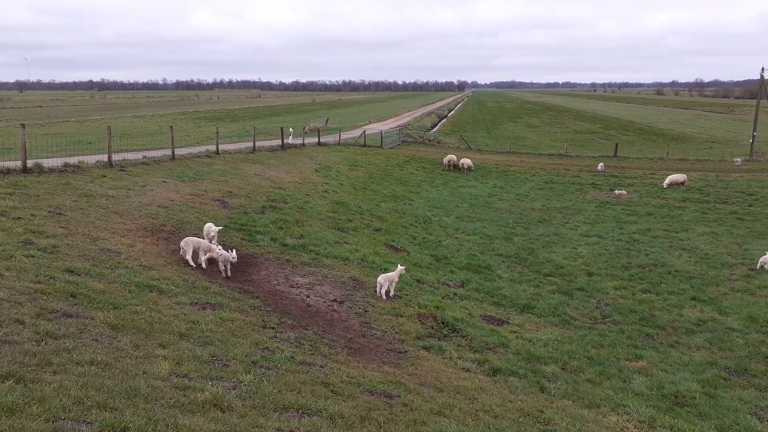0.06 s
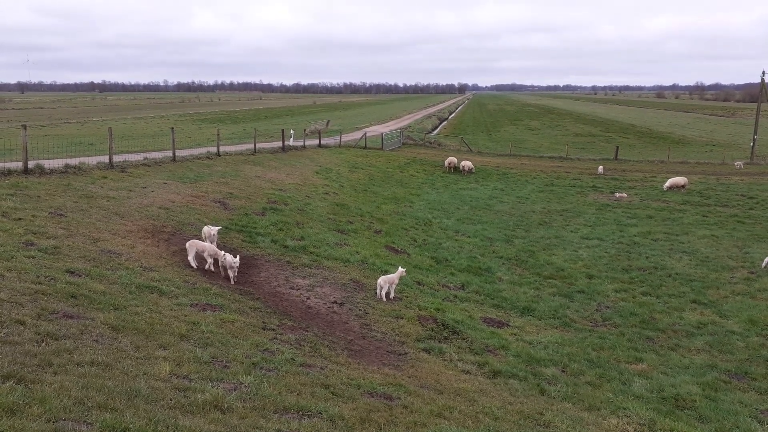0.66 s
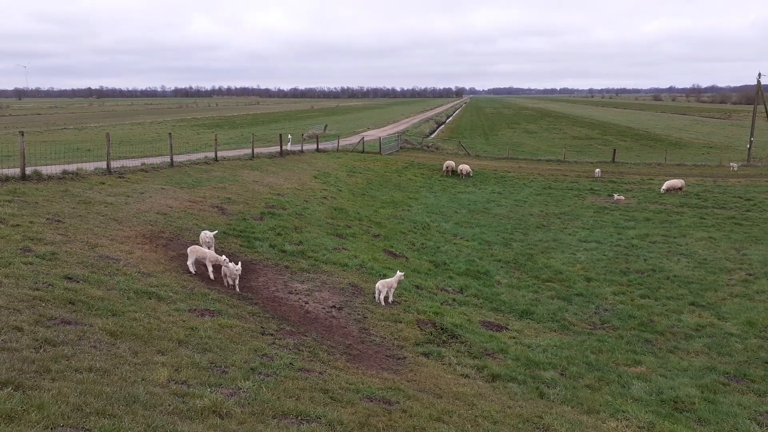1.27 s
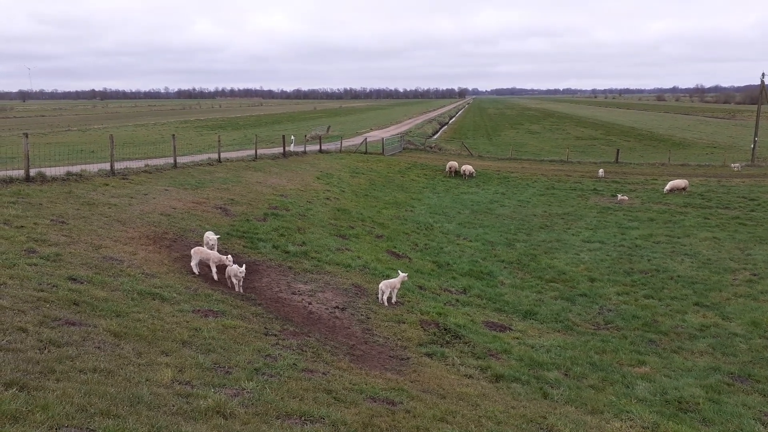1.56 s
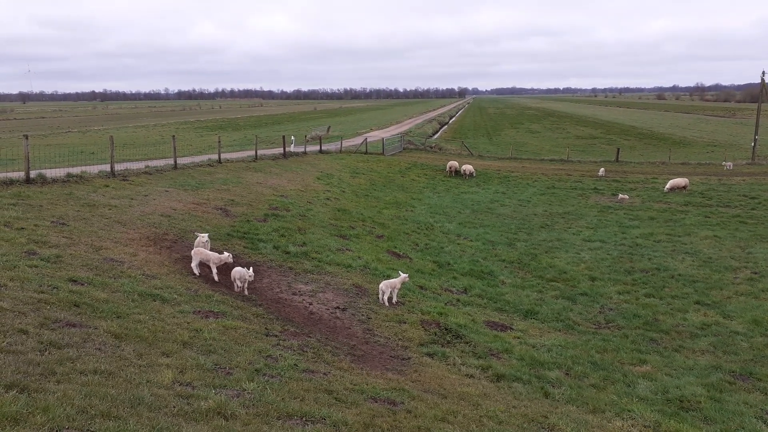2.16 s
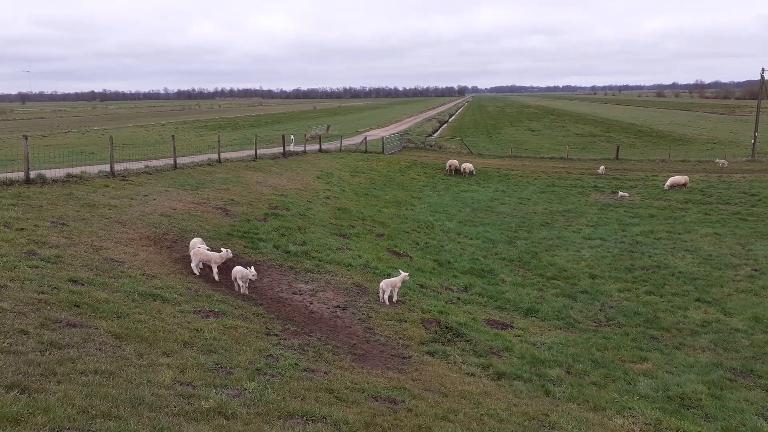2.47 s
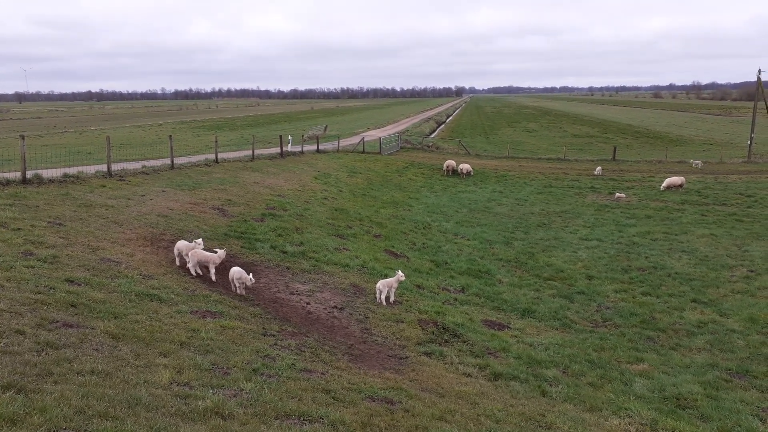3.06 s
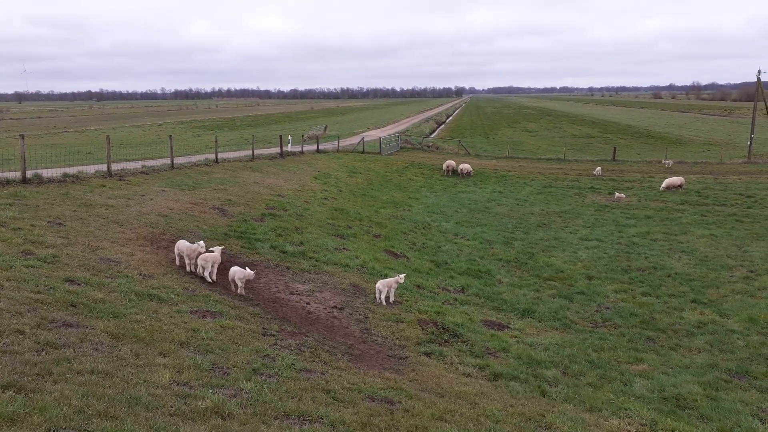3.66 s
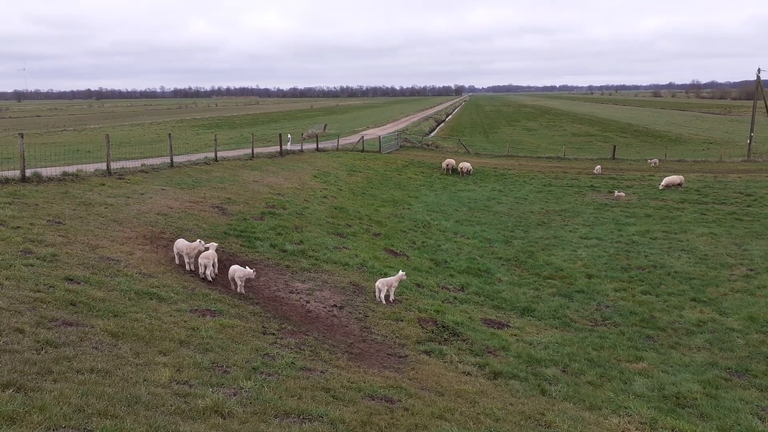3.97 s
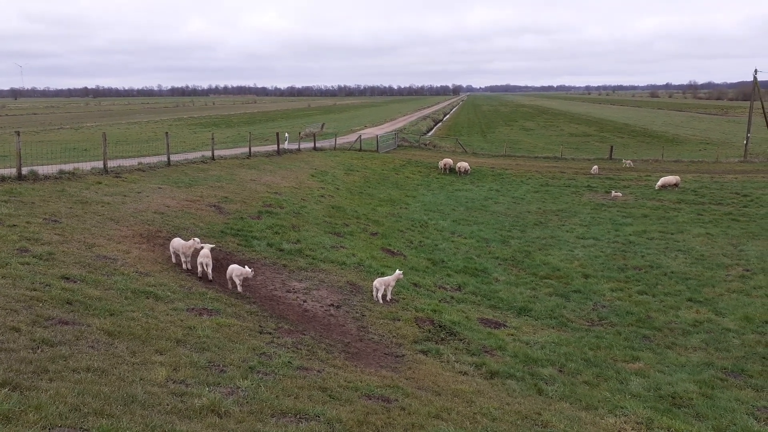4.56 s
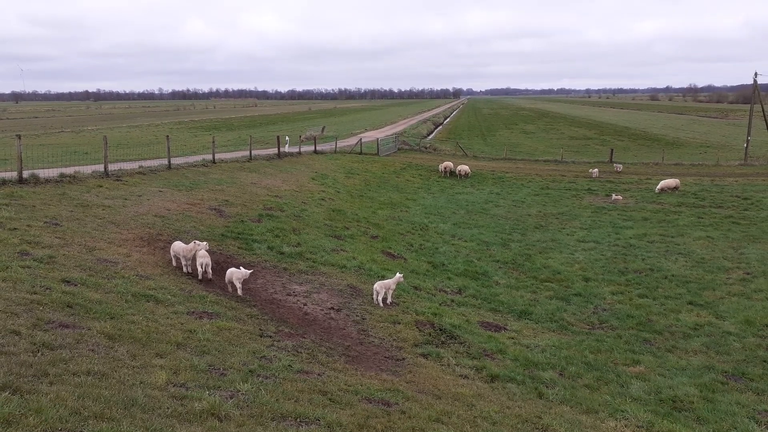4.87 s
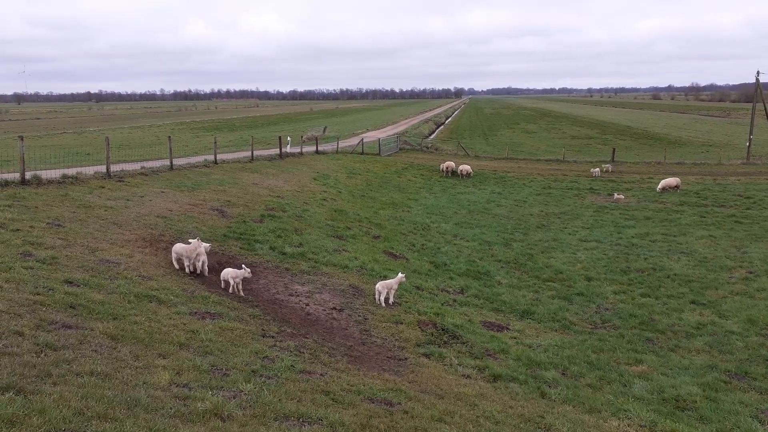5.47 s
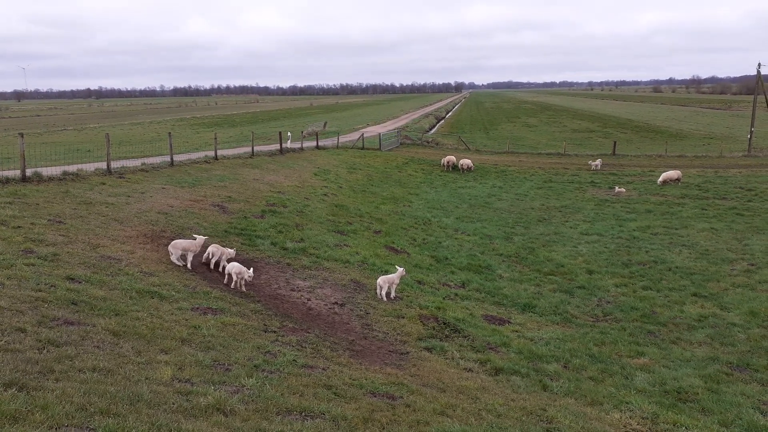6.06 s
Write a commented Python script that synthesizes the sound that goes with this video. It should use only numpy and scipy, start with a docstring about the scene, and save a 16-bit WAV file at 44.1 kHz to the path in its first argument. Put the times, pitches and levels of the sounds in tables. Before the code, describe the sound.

A light wind rumbles and flutters on the microphone in an open pasture, with irregular soft thuds. A lamb gives a faint short bleat, then a louder, high, quavering one follows. A sheep answers very faintly from far down the field, and near the end a lamb bleats again, clearly. Distant birds whistle and chirp very quietly throughout, over a soft hiss and slight rustles.

```python
"""A light wind buffets two microphone ports while far-off birds whistle and slur over a pasture.
Eddies press on the ports as rumble, flutter and soft thuds, above a steady hiss and soft rustles.
Lambs bleat three times, and a sheep once from far down the field. Each bleat is a string of throbs,
about fourteen a second, in which the vocal folds excite the resonances of throat and mouth.
One faint tick sounds near the end."""
import sys
import numpy as np
from scipy import signal
from scipy.fft import rfft, irfft, next_fast_len
from scipy.io import wavfile
from scipy.ndimage import uniform_filter1d

SR = 44100
rng = np.random.default_rng(int(sys.argv[2]) if len(sys.argv) > 2 else 0)


def store_pcm(level_fs):
    """Save levels as 16-bit WAV."""
    pcm = np.round(np.clip(level_fs, -1, 1) * 32767).astype(np.int16)
    wavfile.write(sys.argv[1], SR, np.atleast_2d(pcm).T)


N = 278271

# the breeze between gusts: time_s, rumble_db
BREEZE = [(0, -61), (.52, -70), (.72, -50.5), (1.1, -56.5), (2.1, -52.5), (2.3, -60.5), (2.8, -43.5),
          (3.1, -48), (3.52, -60.5), (3.65, -53), (4.05, -50.5), (4.3, -49), (5.1, -52), (5.9, -51),
          (6.31, -50)]
# the wind veering between the ports: time_s, rumble_left_minus_right_db
VEER = [(0, 2.5), (.3, -0.5), (.55, -44), (.8, -1.5), (1.7, -1.5), (2.7, -3), (3.2, 15), (3.55, 17),
        (4.3, 11), (4.7, -6.5), (5.0, -2.5), (6.31, 4)]
# gusts: peak_s, half_length_s, rumble_db, flutter_minus_rumble_db
GUSTS = [(.01, 0.027, -44, -3), (0.171, 0.016, -48.5, -6.5), (0.332, 0.058, -44, -3),
         (0.78, 0.04, -43.5, -4.5), (0.858, 0.021, -41, 1), (1.34, 0.04, -51, -2), (1.416, .02, -49.5, -22),
         (1.583, 0.052, -44, -2.5), (1.713, 0.023, -46, -0.5), (1.872, 0.053, -45, -7.5),
         (2.174, 0.033, -43, -11), (2.446, 0.047, -43.5, -6.5), (2.658, 0.039, -38, -4),
         (2.724, .024, -40.5, 1), (2.892, 0.015, -40.5, 3), (2.98, 0.021, -47, 2.5),
         (3.219, 0.075, -45.5, 6.5), (3.395, 0.039, -43.5, -3.5), (3.79, 0.085, -51.5, 3.5),
         (4.012, 0.019, -51, 3.5), (4.346, 0.046, -41, 2), (4.531, 0.017, -42.5, 2.5),
         (4.913, 0.098, -45.5, -6.5), (5.067, 0.036, -43, -5.5), (5.191, 0.02, -38, -8.5),
         (5.396, 0.064, -55, 1.5), (5.592, 0.026, -39, 2.5), (5.695, 0.06, -40.5, -12),
         (6.095, 0.033, -37, -1.5), (6.174, 0.052, -43.5, -5)]
# spectral shapes of the wind, hiss and rustle noises: frequency_hz, relative_density_db
RUMBLE_SPECTRUM = [(12, -21.5), (30, -13), (65, -0.5), (120, 3), (200, -2.5), (300, -6), (500, -31),
                   (900, -62.5)]
FLUTTER_SPECTRUM = [(120, -28), (220, -10.5), (330, 3.5), (480, -3.5), (700, -16), (1000, -25.5),
                    (1500, -39), (2500, -44.5), (5000, -63)]
HISS_SPECTRUM = [(180, -35.5), (300, -11), (372, -0.5), (622, -14), (1380, -21), (1740, -32.5), (4550, -29),
                 (5650, -38.5), (9610, -46.5), (10400, -35), (11900, -29), (15000, -26), (15800, -29)]
BRIGHT_RUSTLE_SPECTRUM = [(800, -27), (2200, 3.5), (3000, 4.5), (4800, 5), (7500, -1.5), (9500, -7.5),
                          (11200, 2), (12800, -5.5), (13900, 3), (15000, -10)]
DULL_RUSTLE_SPECTRUM = [(900, 21), (1400, 13), (1750, 11.5), (2150, 11), (2700, 1), (4500, -31),
                        (9000, -70.5)]
# bird notes: start_s, length_s, middle_pitch_hz, relative_level_db, shape_name
BIRD_NOTES = [(0.0, 0.36, 3750, -80.5, "rise"), (.01, 0.059, 4780, -75.5, "whistle"),
              (0.158, 0.25, 4350, -77, "whistle"), (0.484, .12, 3130, -75, "rising buzz"),
              (0.779, 0.2, 3460, -72.5, "falling buzz"), (1.216, 0.1, 4370, -77.5, "whistle"),
              (2.19, 0.023, 3170, -67.5, "fall"), (2.342, 0.12, 3990, -73.5, "whistle"),
              (2.606, 0.052, 4700, -77.5, "droop"), (2.697, 0.064, 4160, -73.5, "whistle"),
              (2.889, 0.089, 4070, -73.5, "droop"), (3.027, .03, 4340, -70.5, "fall"),
              (3.058, 0.05, 4840, -75.5, "trill"), (3.147, 0.072, 3150, -80.5, "fall"),
              (3.237, 0.039, 4240, -73.5, "fall"), (3.273, 0.049, 4730, -69, "trill"),
              (3.358, 0.038, 3000, -71, "fall"), (3.444, 0.02, 3700, -69.5, "droop"),
              (3.459, 0.068, 5100, -74.5, "rise"), (3.574, 0.0167, 4560, -68.5, "rise"),
              (4.122, 0.067, 4600, -77.5, "whistle"), (4.304, .045, 4350, -71.5, "fall"),
              (4.371, 0.036, 4550, -63, "fall"), (4.395, 0.16, 4550, -76.5, "trill"),
              (4.554, 0.07, 3350, -74.5, "rising buzz"), (4.636, 0.082, 5050, -74.5, "arch"),
              (4.712, 0.11, 2860, -77, "falling buzz"), (4.767, 0.08, 4940, -77.5, "arch"),
              (5.72, 0.21, 2950, -76, "falling buzz"), (6.015, 0.47, 2618, -74.5, "droop")]
# pitch contours by shape name: start_to_middle_ratio, end_to_middle_ratio, trill_share
NOTE_SHAPES = {"whistle": (1.01, 0.96, 0.15), "droop": (1.09, 0.88, 0.11), "trill": (1.01, 0.94, .65),
               "fall": (1.15, 0.826, 0.43), "rise": (0.72, 1.06, 0.17), "arch": (.85, .77, 0.18),
               "rising buzz": (.88, 1.2, 1), "falling buzz": (1.26, .93, .85)}
# soft rustles: peak_s, half_length_s, bright_db, dull_db
RUSTLES = [(0.733, 0.16, -65, -71), (.92, 0.18, -70.5, -71), (1.586, 0.22, -71, -69.5),
           (3.053, 0.07, -78, -73), (3.45, 0.19, -81, -64.5), (3.768, 0.058, -72.5, -69),
           (4.29, .17, -97, -63.5), (6.25, 0.61, -96, -69)]
# the strongest single eddies at the ports: start_s, peak_db, left_minus_right_db
EDDIES = [(.761, -30.5, -3), (1.704, -35.5, -15), (2.714, -27, 1), (2.886, -21.5, -2), (3.723, -33, 0),
          (4.538, -34, 6), (5.048, -29, 26), (5.584, -22.5, 0.5), (6.094, -22.5, 3)]
# each bleat from first throb to last: time_s, pitch_hz, level_db, roughness_share, brightness_db
FAINT_BLEAT = [(.775, 363, -52.5, 0.25, 9), (.921, 378.3, -52, 0.45, -1), (1.067, 359.5, -60.5, 0.33, -3)]
NEAR_BLEAT = [(1.556, 325.6, -54.5, 0.66, 2.1), (1.705, 344, -65.5, 0.28, 5), (1.852, 358, -46, 0.32, 9.5),
              (1.93, 360.3, -42, 0.37, 2.5), (2.0, 352.7, -43, 0.31, 1), (2.076, 335.3, -46.5, 0.35, 2),
              (2.149, 343, -45, 0.38, 2)]
FAR_BLEAT = [(3.84, 357, -70.5, 0.87, 0), (4.48, 352.4, -71, 0.82, 0)]
LAST_BLEAT = [(4.96, 387, -54, 0.23, -25), (5.04, 403.3, -46.5, .16, -7), (5.247, 409.2, -41, 0.23, -4),
              (5.32, 390.4, -43.5, 0.22, -5), (5.463, 393.3, -40.5, 0.31, 3), (5.605, 383.2, -46, 0.85, -2)]
# resonances of throat and mouth: centre_hz, width_hz, relative_gain_db
FAINT_FORMANTS = [(1160, 480, 1), (2200, 400, -3.5), (3540, 1200, -3), (4420, 350, 6), (5200, 300, 0),
                  (6860, 690, -25)]
NEAR_FORMANTS = [(1019, 150, 7.5), (1270, 690, 1), (1920, 140, 0), (2700, 180, 6.5), (3260, 370, 1),
                 (4040, 540, 1), (4900, 150, -4.5), (6450, 630, 4), (6970, 390, -18), (7990, 630, -1.5),
                 (10700, 1700, -20)]
FAR_FORMANTS = [(1360, 300, 9), (2010, 340, 4)]
LAST_FORMANTS = [(1287, 240, -0.5), (1690, 240, -6.5), (2080, 260, -7.5), (2435, 180, -20),
                 (2920, 420, -11), (3320, 310, -2.5), (4033, 150, -2), (4700, 370, -3.5), (5470, 460, -2),
                 (6120, 200, -11), (7130, 490, -23.5), (11100, 4600, -33)]
# a faint tick: start_s, excitation_db, centre_hz, width_hz
TICK = (5.888, -61, 7500, 4500)

THROBS_PER_S = 13.7


def from_db(db):
    """Amplitude grows tenfold for every 20 decibels."""
    return 10 ** (np.asarray(db) / 20)


def unit_rms(x):
    """Division by the root mean square gives unit power."""
    return x / np.sqrt(np.mean(x ** 2) + 1e-20)


def curve(rows):
    """Linear interpolation gives a value at every sample."""
    return np.interp(np.arange(N) / SR, *np.transpose(rows))


def add(out, sound, start_s):
    """Superposition: a sound adds to those already present."""
    at = int(round(start_s * SR))
    first, last = max(at, 0), min(at + sound.shape[-1], N)
    out[..., first:last] += sound[..., first - at:last - at]


def panned(side_db):
    """A level difference at constant power sets the direction."""
    gains = from_db(np.array([[1], [-1]]) * side_db / 2)
    return gains / np.sqrt(np.mean(gains ** 2, axis=0))


def drift(corner_hz, size=N):
    """Low-passed noise wanders smoothly, with unit rms."""
    hz = np.arange(size // 2 + 1) * SR / size
    return unit_rms(irfft(rfft(rng.standard_normal(size)) / (1 + (hz / corner_hz) ** 4), size))


def noise(spectrum, drive=1):
    """Spectral shaping colours two uncorrelated channels of white noise."""
    size = next_fast_len(N)
    hz, db = np.transpose(spectrum)
    bin_hz = np.arange(size // 2 + 1) * SR / size
    gain = from_db(np.interp(np.log(bin_hz + 1), np.log(hz), db))
    white = rng.standard_normal((2, N)) * drive
    return unit_rms(irfft(rfft(white, size) * gain, size)[:, :N])


def resonate(x, hz, width_hz):
    """A damped resonator passes one band, with unit gain at its peak."""
    r = np.exp(-np.pi * width_hz / SR)
    feedback = [1, -2 * r * np.cos(2 * np.pi * hz / SR), r * r]
    return signal.lfilter(np.array([1, 0, -1]) * (1 - r * r) / 2, feedback, x)


def puff(peak_s, half_s):
    """The envelope of a puff of air rises faster than it decays."""
    late_s = np.arange(N) / SR - peak_s
    away = np.minimum(np.abs(late_s) / (half_s * np.where(late_s < 0, .7, 1.047)), 10)
    return np.exp(-.5 * away ** 3)


def turbulence(spectrum, shared, burst_db, burst_hz):
    """Intermittency: small eddies arrive in quick bursts about a steady mean power."""
    chance = np.array([drift(burst_hz), drift(burst_hz)])
    pressure = noise(spectrum, drive=from_db(burst_db * np.minimum(chance, 1.3)))
    pressure = pressure + shared * pressure[::-1]
    power = uniform_filter1d(uniform_filter1d(np.mean(pressure ** 2, axis=0), SR // 25), SR // 40)
    return pressure / np.sqrt(power + 1e-9)


def wind():
    """Turbulent pressure at the ports rumbles and flutters; breeze and gusts add in power."""
    breeze = from_db(curve(BREEZE) + 5 * drift(corner_hz=15.7))
    rumble_power, flutter_power = breeze ** 2, (breeze * from_db(-8.5)) ** 2
    for peak_s, half_s, db, flutter_db in GUSTS:
        gust = from_db(db) * puff(peak_s, half_s)
        rumble_power += gust ** 2
        flutter_power += (gust * from_db(flutter_db)) ** 2
    rumble = turbulence(RUMBLE_SPECTRUM, shared=.014, burst_db=8.5, burst_hz=64.6)
    flutter = turbulence(FLUTTER_SPECTRUM, shared=.022, burst_db=11.5, burst_hz=71.4)
    side_db = curve(VEER)
    rumble *= np.sqrt(rumble_power) * panned(side_db)
    flutter *= np.sqrt(flutter_power) * panned(-.5 - .22 * side_db)  # leans to the other port
    return rumble + flutter


def birds(trill_hz, trill_depth, waver):
    """Each note is a gliding tone; amplitude and frequency modulation chop it into a trill."""
    song, unsteady = np.zeros(N), drift(200)
    for start_s, length_s, middle_hz, db, shape in BIRD_NOTES:
        start, end, trill = NOTE_SHAPES[shape]
        progress = np.linspace(0, 1, int(length_s * SR))
        beat = 2 * np.pi * trill_hz * length_s * progress
        glide = np.polyval(np.polyfit([0, .5, 1], [start, 1, end], 2), progress)
        wander = waver * (.82 + trill) * np.roll(unsteady, -int(start_s * SR))[:len(progress)]
        hz = middle_hz * glide * (1 - trill_depth * trill * np.sin(beat) + wander)
        envelope = np.sqrt(np.abs(np.sin(np.pi * progress))) * (1 + trill * np.cos(beat))
        tone = np.sqrt(2) * np.sin(2 * np.pi * np.cumsum(hz) / SR)
        add(song, from_db(db) * envelope * tone, start_s)
    song *= from_db(2.5 * drift(35))  # moving air makes far calls come and go
    return np.array([song, song])


def field_scatter(sound, t60_s, cutoff_hz=7000):
    """Scattering from grass, banks and fences leaves a short, exponentially decaying tail."""
    t = np.arange(SR // 2) / SR
    tail = rng.standard_normal((2, len(t))) * from_db(-60 * t / t60_s) * (t > .004)
    tail = signal.sosfilt(signal.butter(1, cutoff_hz, fs=SR, output="sos"), tail)
    return signal.fftconvolve(sound, tail / np.sqrt(np.sum(tail ** 2) / 2), axes=1)[:, :N]


def hiss(level_db):
    """Stationary broadband noise forms the floor of the scene."""
    return from_db(level_db) * noise(HISS_SPECTRUM)


def rustling(bright_rest_db, dull_rest_db):
    """Incoherent sounds add in power: rustles swell above a bright and a dull bed of noise."""
    bright_power, dull_power = from_db(bright_rest_db) ** 2, from_db(dull_rest_db) ** 2
    for peak_s, half_s, bright_db, dull_db in RUSTLES:
        swell = puff(peak_s, half_s)
        bright_power += (from_db(bright_db) * swell) ** 2
        dull_power += (from_db(dull_db) * swell) ** 2
    bright = np.sqrt(bright_power) * noise(BRIGHT_RUSTLE_SPECTRUM)
    dull = np.sqrt(dull_power) * noise(DULL_RUSTLE_SPECTRUM)
    return bright + dull


def eddies(median_hz, rise_s):
    """An eddy crossing a port is a pressure transient, heard as a soft thud."""
    thuds, t = np.zeros((2, N)), np.arange(2048) / SR
    envelope = (t / rise_s * np.exp(1 - t / rise_s)) ** 2
    for start_s, db, side_db in EDDIES:
        chance = rng.standard_normal((2, 2))  # each port has its own frequency and phase
        hz = median_hz * np.exp(.47 * chance[:, :1])
        swing = np.sin(2 * np.pi * hz * t + np.pi * chance[:, 1:])
        add(thuds, from_db(db) * panned(side_db) * swing * envelope, start_s)
    return thuds


def vocal_folds(t, pitch_hz, slope, arch, roughness):
    """Periodic closure of the folds yields harmonics, with a rush of air once in every cycle."""
    size = len(t)
    position = np.clip(t / .02, -1.5, 1.5)
    arch = arch * rng.uniform(.55, 1.35)  # no two throbs arch alike in pitch
    jitter = .036 * roughness * drift(227, size)
    hz = pitch_hz * (1 + slope * position - arch * position ** 2 + jitter)
    phase = 2 * np.pi * (np.cumsum(hz) / SR + rng.random())
    harmonics = sum(np.cos(k * phase) * from_db(3.3 * drift(30, size)) for k in range(1, 37))
    breath = unit_rms(rng.standard_normal(size) * (1 + .82 * np.cos(phase)))
    shimmer = 1 + .5 * roughness * drift(220, size)
    return unit_rms(harmonics) * shimmer + 1.25 * roughness * breath


def throat(source, formants, formant_scale, bright_db):
    """Source and filter: parallel resonances shape the voice, which is then held at unit power."""
    voice = 0
    for centre_hz, width_hz, db in formants:
        # a harder push lifts the upper resonances
        lift_db = bright_db * np.clip(np.log2(centre_hz / 3300), 0, 1)
        hz = centre_hz * formant_scale
        voice += from_db(db + lift_db) * resonate(resonate(source, hz, width_hz), hz, width_hz)
    voice = signal.sosfilt(signal.butter(3, 850, "high", fs=SR, output="sos"), voice)
    return voice / np.sqrt(uniform_filter1d(voice ** 2, SR // 60) + 1e-12)


def bleat(course, formants, throb_half_s, arch, slope, left_lag_ms):
    """A call pulses in evenly spaced throbs; a path difference delays it at one port."""
    times, *controls = np.transpose(course)
    count = int(round((times[-1] - times[0]) * THROBS_PER_S)) + 1
    beats = np.linspace(times[0], times[-1], count)
    pitches, levels, roughnesses, brights = [np.interp(beats, times, c) for c in controls]
    t = np.arange(-3072, 3072) / SR
    late = (t - .003) / throb_half_s
    # a throb builds up more slowly than it breaks off
    envelope = np.exp(-.7 * np.abs(late / np.where(late < 0, 1.2, .85)) ** 2.7)
    call = np.zeros(N)
    for beat_s, hz, db, roughness, bright_db in zip(beats, pitches, levels, roughnesses, brights):
        hz *= 1 + .0085 * rng.standard_normal()
        # the larynx rises with the pitch and shortens the throat
        formant_scale = (hz / pitches.mean()) ** .16
        source = vocal_folds(t, hz, slope, arch, roughness)
        voice = throat(source, formants, formant_scale, bright_db)
        add(call, from_db(db) * voice * envelope, beat_s + t[0])
    lag = int(round(left_lag_ms * SR / 1000))
    return np.array([np.roll(call, lag), call])


def tick(decay_s):
    """A decaying noise burst excites a broad, high resonance."""
    start_s, db, hz, width_hz = TICK
    out, t = np.zeros((2, N)), np.arange(SR // 50) / SR
    burst = rng.standard_normal(len(t)) * np.exp(-t / decay_s)
    add(out, from_db(db) * resonate(burst, hz, width_hz), start_s)
    return out


def scene():
    """Direct and scattered calls superpose with wind, rustles and hiss at the microphone."""
    flock = bleat(FAINT_BLEAT, FAINT_FORMANTS, throb_half_s=.012, arch=.08, slope=-.0148, left_lag_ms=.25)
    flock += bleat(NEAR_BLEAT, NEAR_FORMANTS, throb_half_s=.017, arch=.115, slope=-.02, left_lag_ms=0)
    flock += bleat(FAR_BLEAT, FAR_FORMANTS, throb_half_s=.024, arch=.14, slope=0, left_lag_ms=-.42)
    flock += bleat(LAST_BLEAT, LAST_FORMANTS, throb_half_s=.016, arch=.075, slope=-.027, left_lag_ms=.27)
    song = birds(trill_hz=60, trill_depth=.07, waver=.016)
    far_birds = from_db(-1) * song + from_db(-2) * field_scatter(song, t60_s=.15)
    background = rustling(bright_rest_db=-82.5, dull_rest_db=-77.5) + tick(decay_s=.013)
    background += hiss(level_db=-62.5)
    buffeting = wind() + eddies(median_hz=200, rise_s=.0026)
    flock += from_db(-18) * field_scatter(flock, t60_s=.2)
    return buffeting + far_birds + background + flock


def record(dry):
    """An elliptic low-pass filter cuts the treble steeply above 15.9 kHz."""
    return signal.sosfilt(signal.ellip(10, .1, 70, 15900, fs=SR, output="sos"), dry)


dry = scene()
out = record(dry)
store_pcm(out)
```